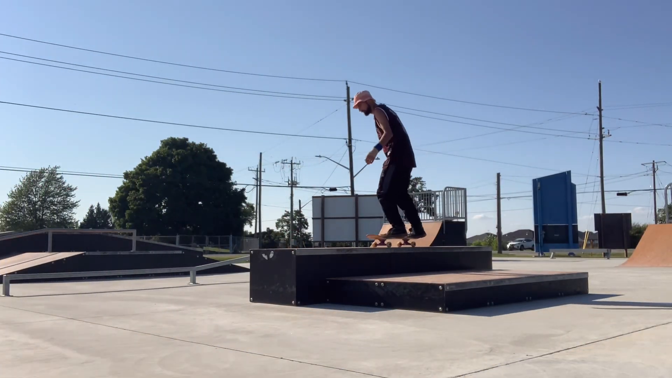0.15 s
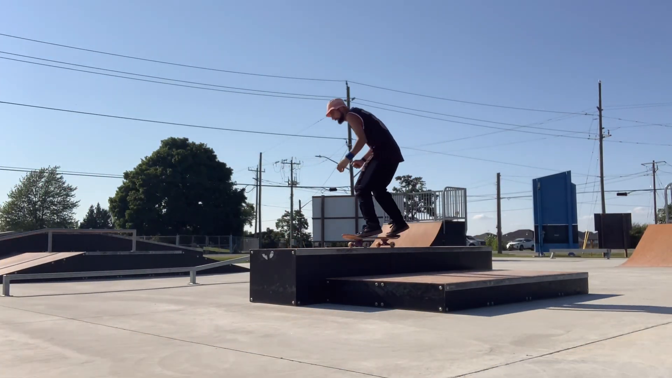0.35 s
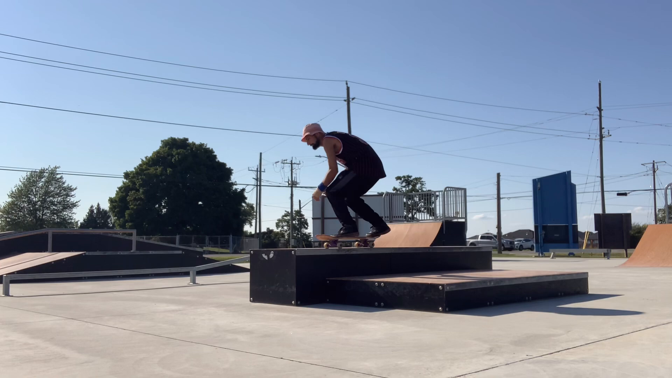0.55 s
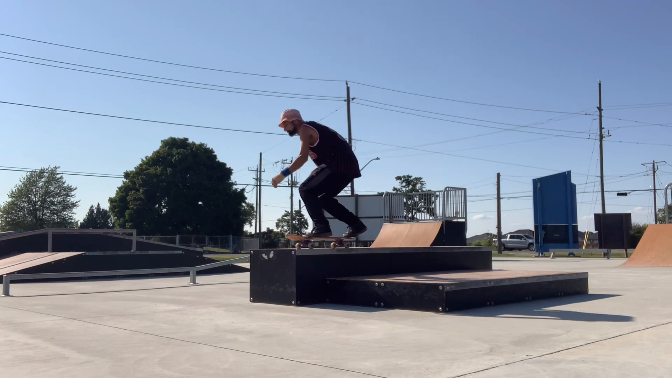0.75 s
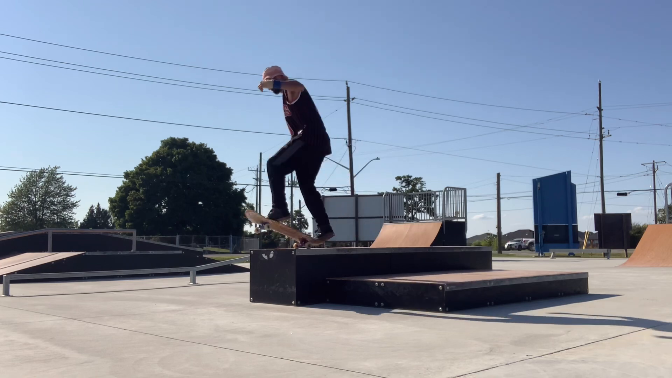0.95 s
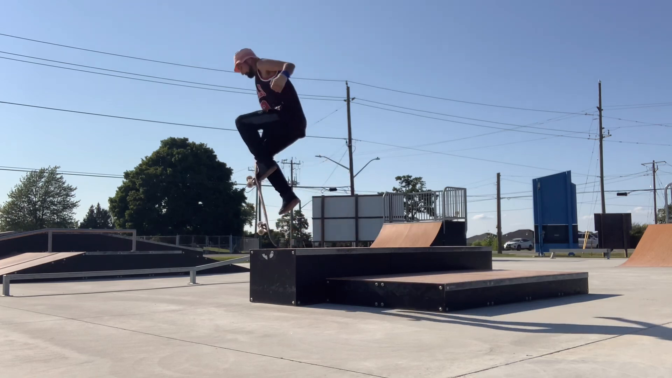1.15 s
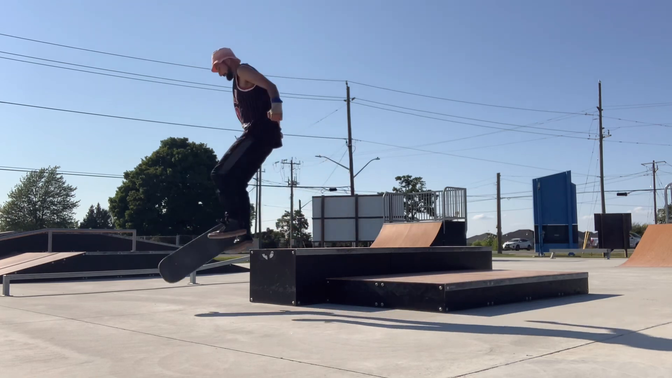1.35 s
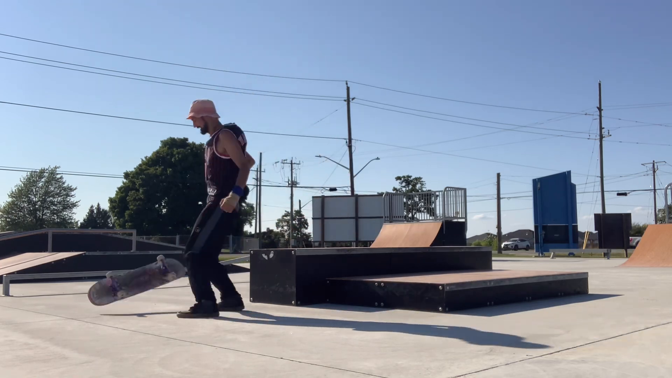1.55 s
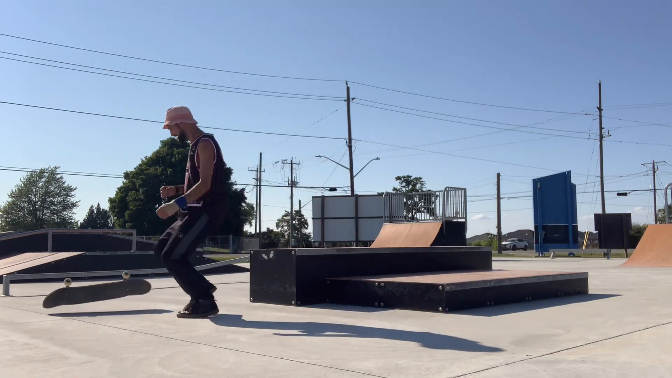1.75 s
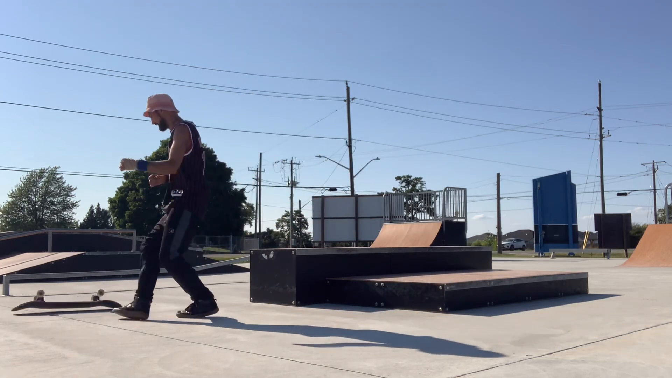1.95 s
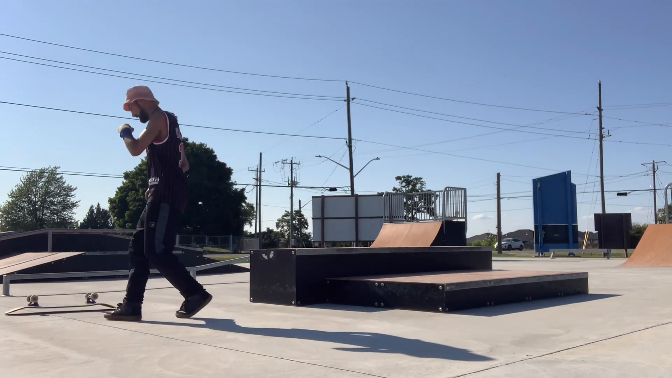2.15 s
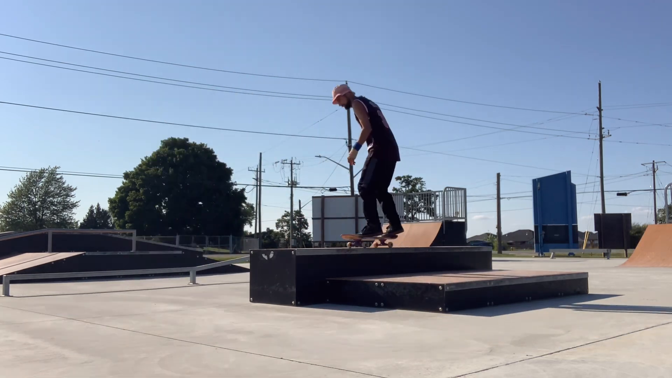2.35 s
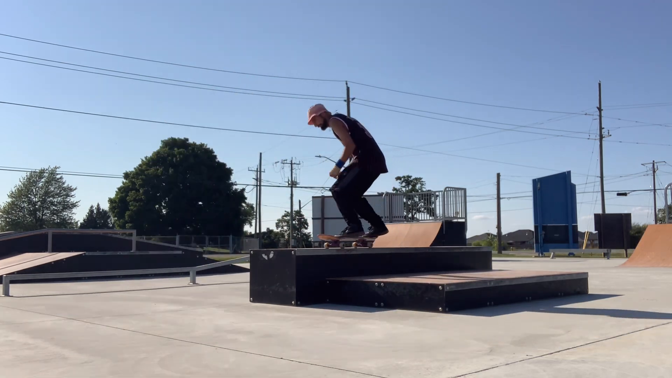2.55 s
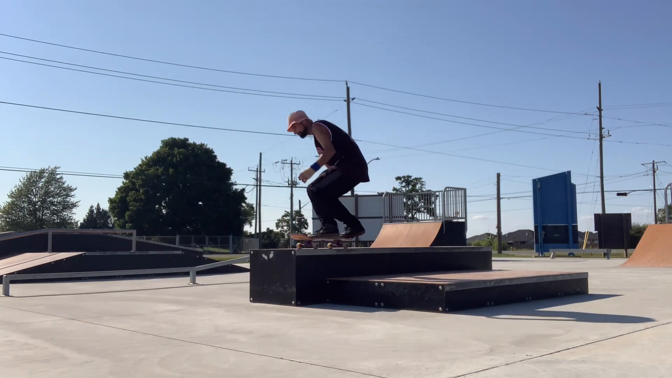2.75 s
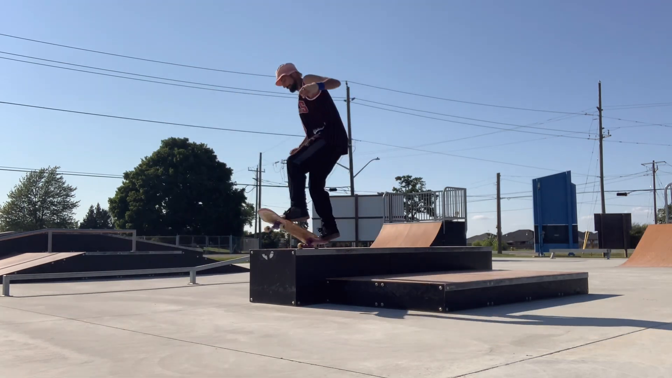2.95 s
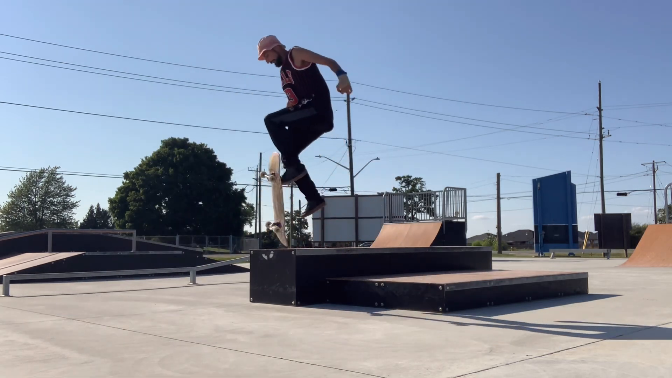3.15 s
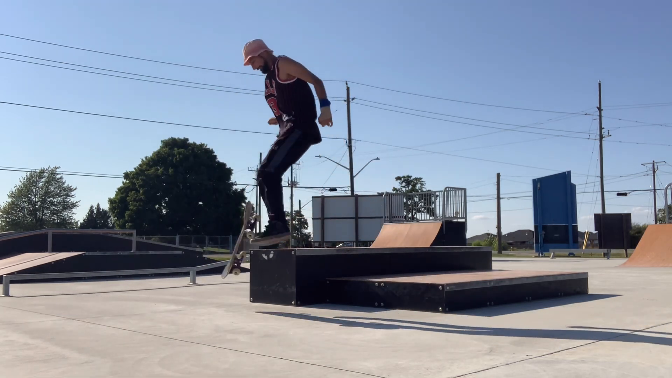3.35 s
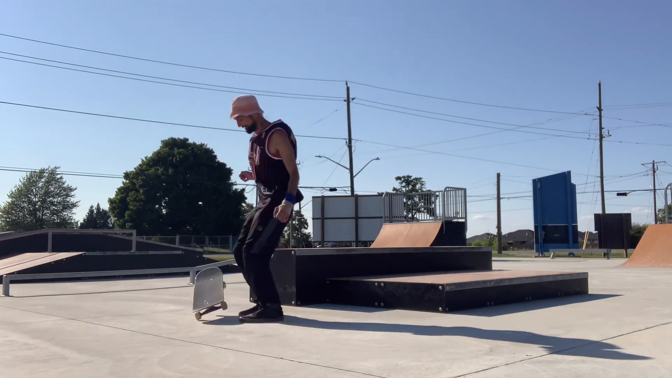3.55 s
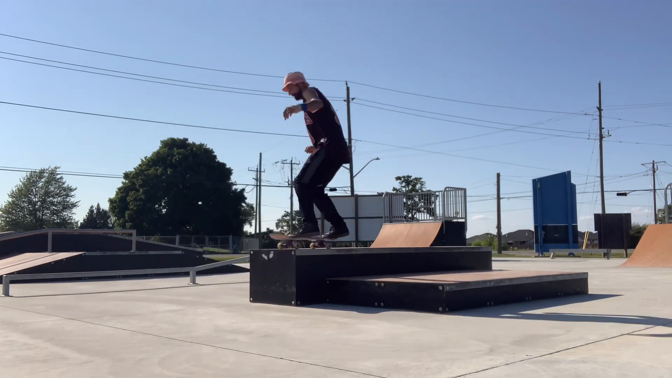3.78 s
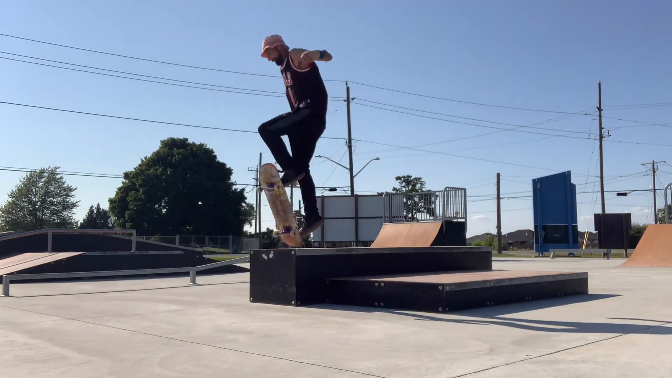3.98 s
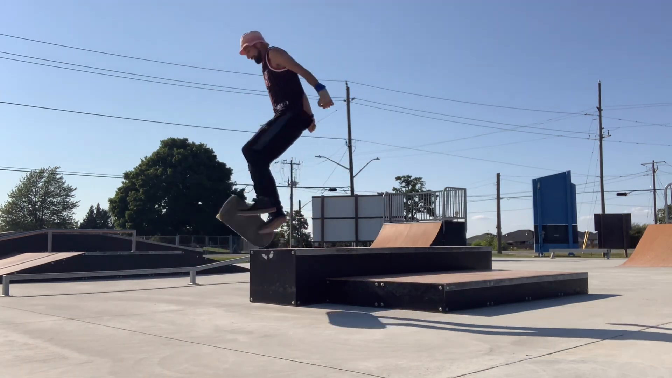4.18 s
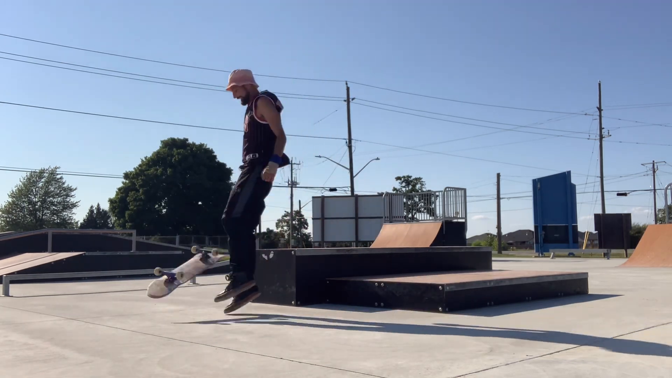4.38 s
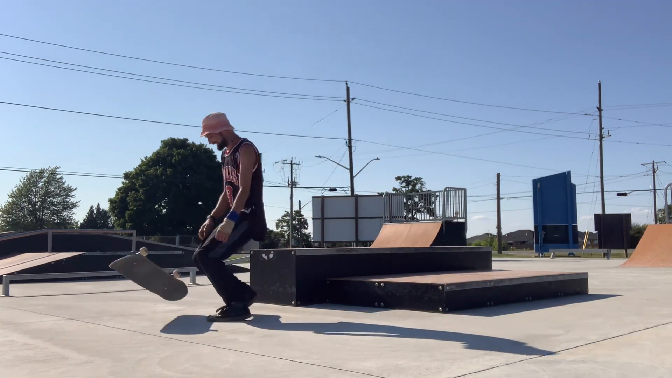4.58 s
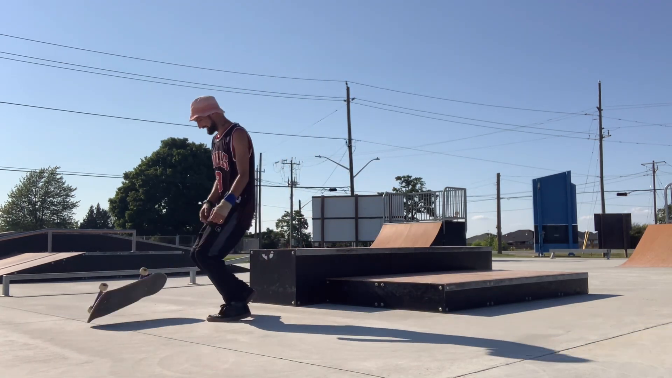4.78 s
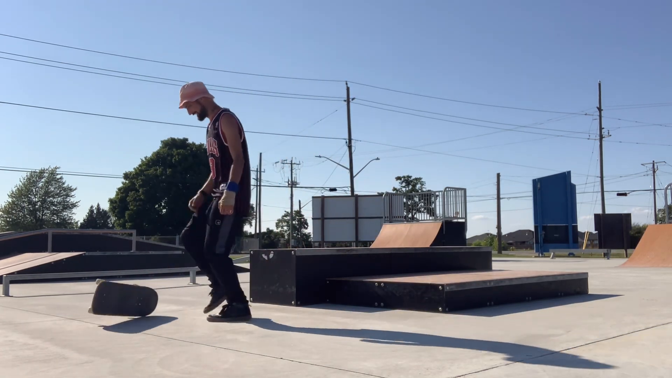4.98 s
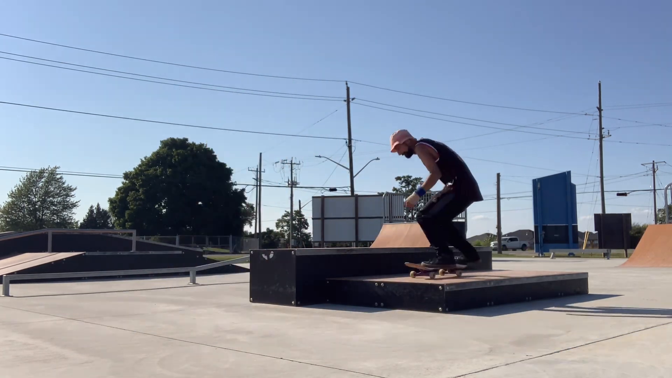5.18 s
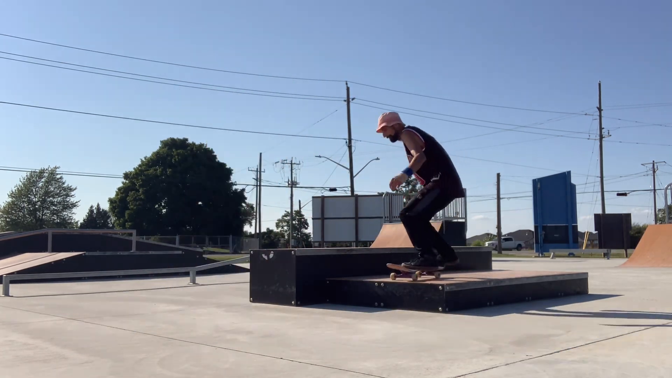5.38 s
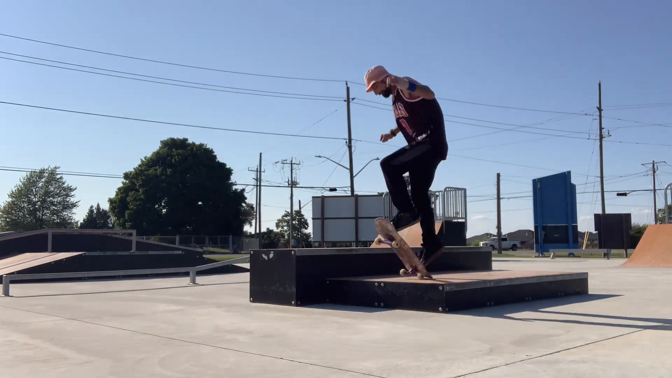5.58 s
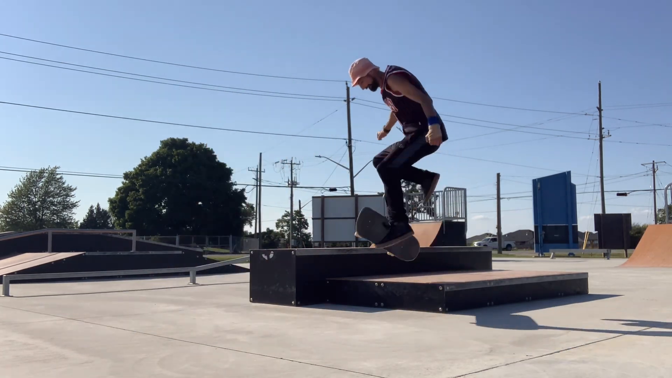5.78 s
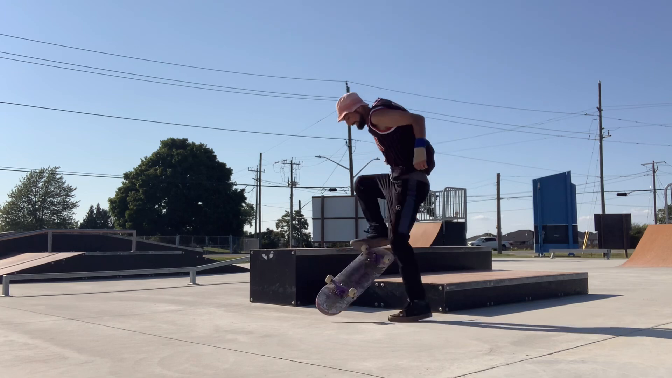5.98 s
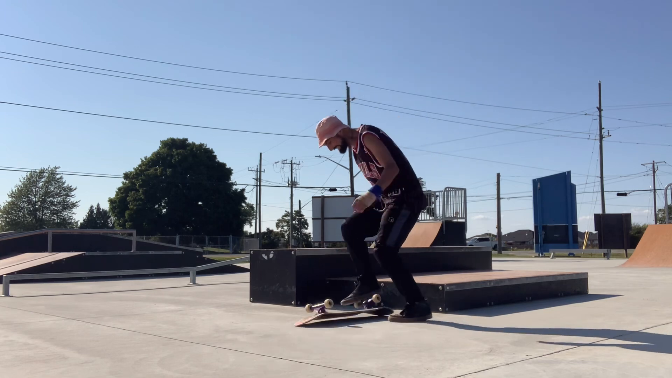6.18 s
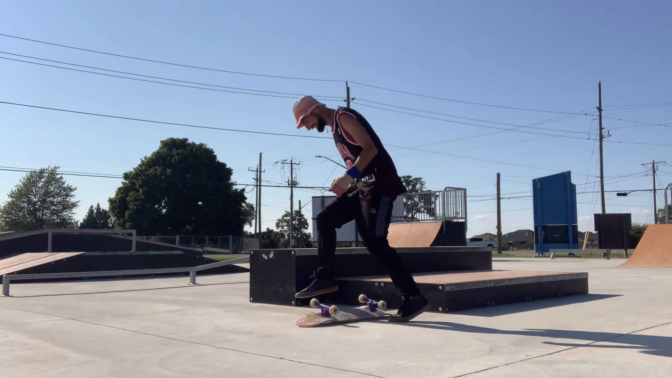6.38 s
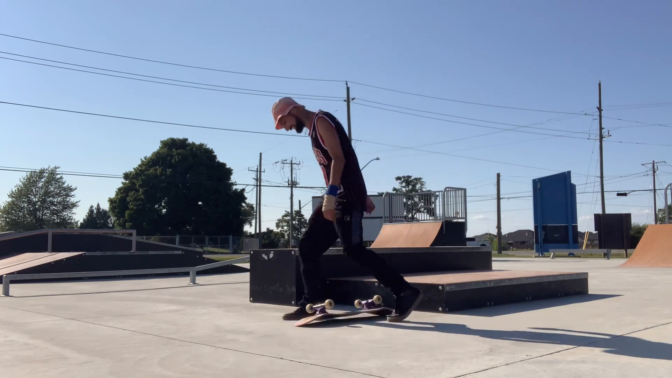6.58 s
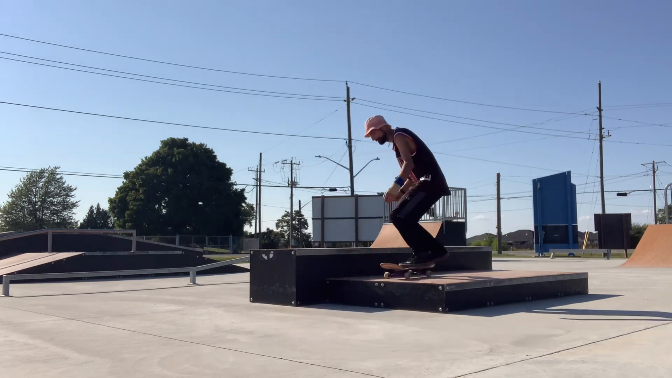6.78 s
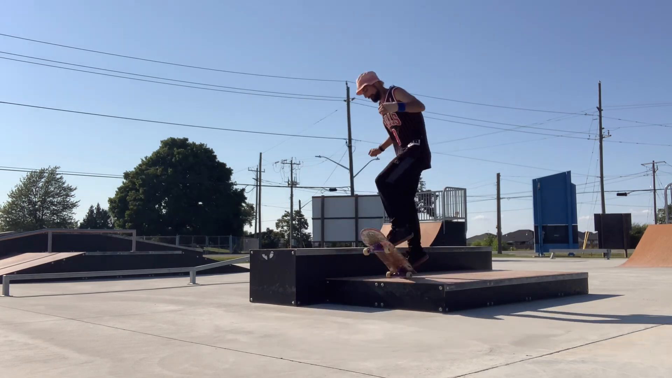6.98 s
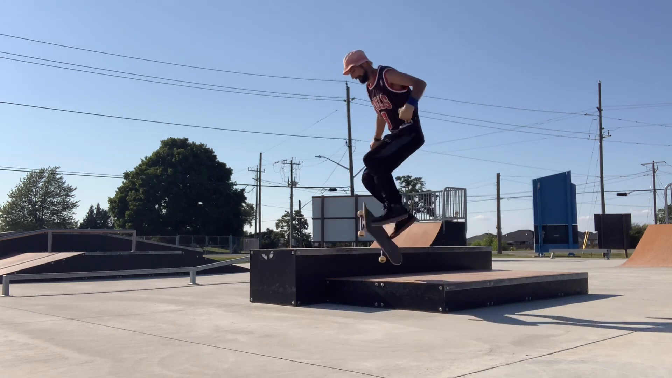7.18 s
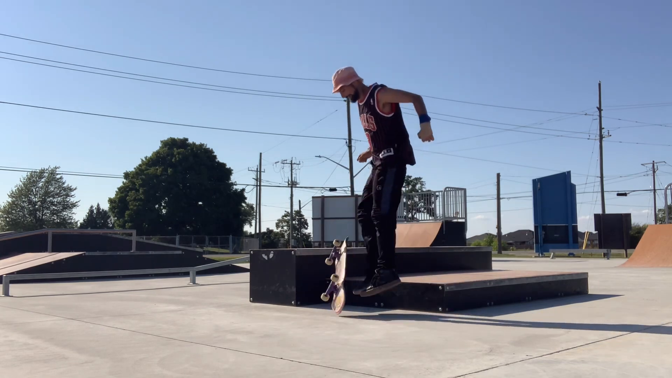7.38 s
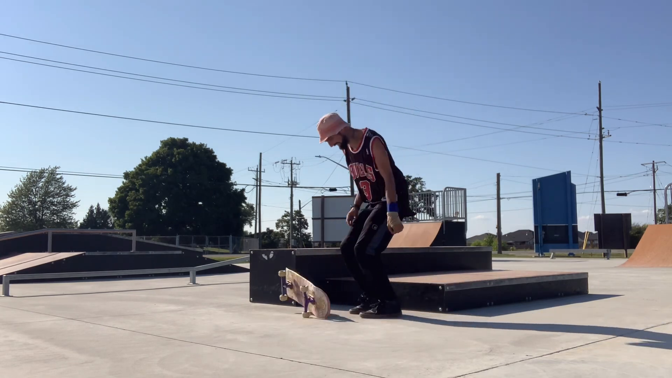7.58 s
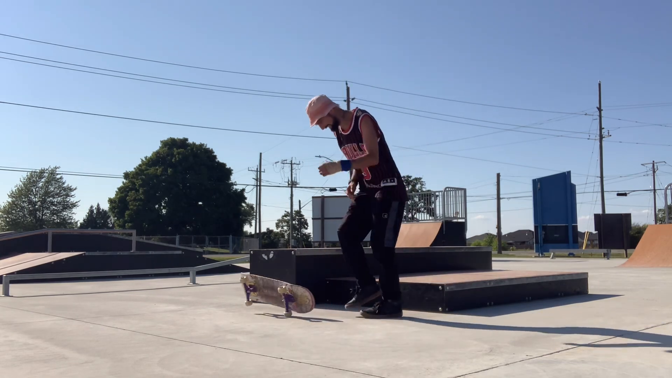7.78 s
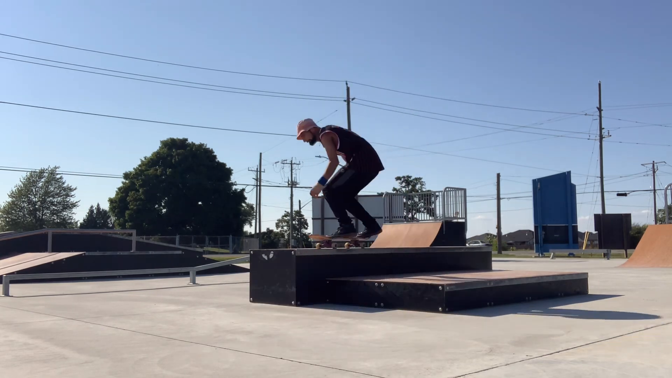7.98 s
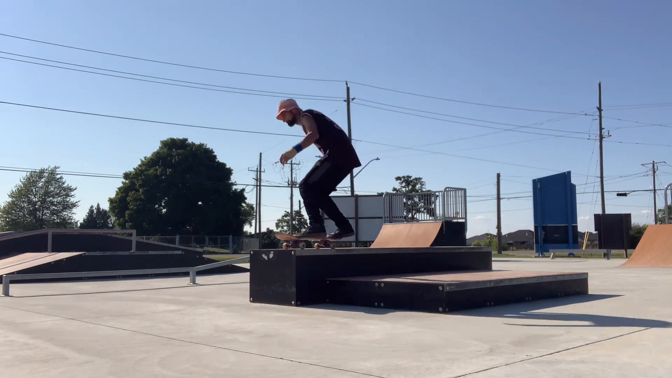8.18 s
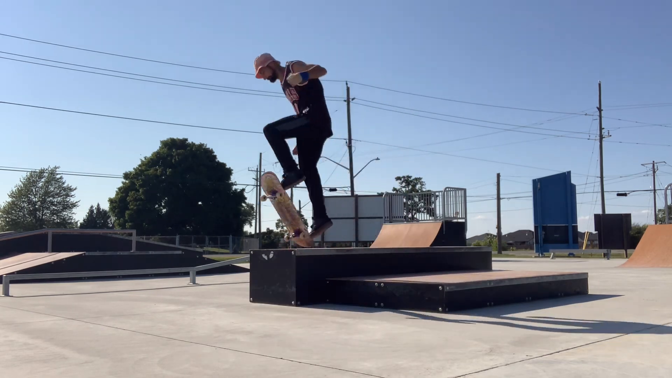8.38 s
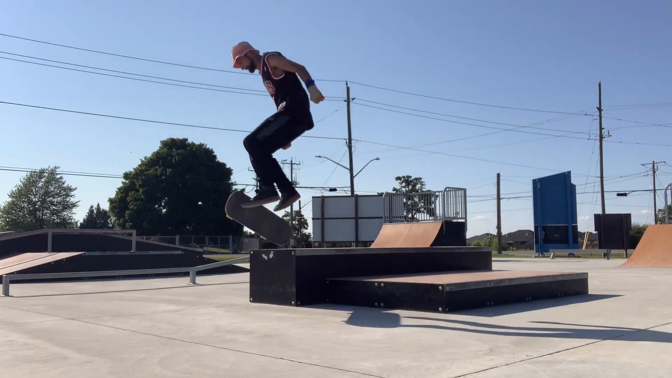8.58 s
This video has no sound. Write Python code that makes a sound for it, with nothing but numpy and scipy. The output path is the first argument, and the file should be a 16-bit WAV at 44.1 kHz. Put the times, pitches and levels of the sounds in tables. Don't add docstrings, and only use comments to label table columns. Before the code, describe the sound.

Six short skateboard attempts joined abruptly in an open concrete skatepark, heard from a phone some metres away. Each brings a tail pop or taps on a hollow wooden box, then usually loud woody slams, bounces and clatter on concrete with a short echo. Wind thumps and flutters in bursts over very faint traffic hum; the last try stops after its pop and a light rattle.

```python
import sys
import numpy as np
from scipy import signal
from scipy.fft import rfft, irfft, next_fast_len
from scipy.io import wavfile
from scipy.ndimage import uniform_filter1d, map_coordinates

SR = 44100
rng = np.random.default_rng(int(sys.argv[2]) if len(sys.argv) > 2 else 0)


def digitize_waveform(pressure):
    field = np.atleast_2d(pressure).T
    bounded = np.clip(field, -1, 1)
    quanta = np.round(bounded * 32767).astype(np.int16)
    wavfile.write(sys.argv[1], SR, quanta)


def boost_factor(decibels):
    exponent = np.asarray(decibels, float) / 20
    return 10 ** exponent


N = 381024

# (time [s], peak [dB], deck tone [Hz], clack [dB], tick [dB])
SLAMS = [(1.407, -2.5, 907, -31, -34.5), (1.492, -10.5, 384, -16.5, -32), (1.656, -1, 616.4, -12, -37.5),
         (1.718, -4, 630.6, -11, -51.5), (1.91, -11, 430.4, -13.5, -39), (1.943, -11, 634, -12.5, -62.5),
         (2.022, -20.5, 680, -23.5, -32), (2.136, -32, 970, -27, -37), (2.087, -41, 644, -26, -40),
         (2.147, -28, 1000, -47, -53.5), (3.468, -15, 906, -26, -17.5), (3.518, -23, 405, -7, -22.5),
         (3.533, -12, 827, -12.5, -30.5), (3.542, -15.5, 407.3, -22, -44), (4.359, 0.64, 703, -38.5, -36.5),
         (4.557, -0.5, 1000, -27, -50), (4.763, -10.5, 708.6, -21, -28.5), (4.898, -6, 735.7, -50.5, -52),
         (6.021, -0.56, 630, -16.5, -45.5), (6.078, -4.5, 849.6, -6, -44.5), (6.118, -7.5, 770, -5, -47),
         (7.393, -3.5, 990, -29.5, -31.5), (7.577, -13.5, 841, -47, -41), (7.659, -8.5, 854, -24.5, -28.5),
         (7.896, -16.5, 829, -37, -32)]
# (time [s], peak [dB], deck tone [Hz], tick [dB])
POPS = [
    (0.992, -24.5, 819, -13.5),
    (2.994, -19.5, 897, -16.5),
    (3.923, -18.5, 987, -21),
    (5.519, -61, 836, -2),
    (5.534, -57, 855, -7),
    (5.6, -28.5, 842, -23),
    (6.501, -36, 502, -19.5),
    (7.035, -14, 1138, -21),
    (8.342, -21, 737, -15),
]
# (time [s], peak [dB], deck tone [Hz], clack [dB])
RATTLES = [(1.201, -29, 605, -21), (1.473, -28.5, 412, -14), (1.462, -34, 600, -11.5),
           (1.517, -30.5, 500, -11), (1.523, -28, 465, -11.5), (1.531, -30.5, 450, -12),
           (1.555, -32.5, 400, -12.5), (1.677, -21.5, 649, -13), (1.781, -30.5, 2210, -11.5),
           (1.96, -24, 386, -12.5), (1.974, -24, 500, -24), (1.999, -35.5, 2240, -17),
           (3.369, -62, 720, -4), (3.491, -25, 616, -17.5), (3.51, -33.5, 700, -6),
           (3.556, -27.5, 2100, -16), (4.081, -24, 615, -20.5), (4.402, -30, 900, -14),
           (4.425, -29, 800, -9), (4.45, -27.5, 900, -12.5), (4.49, -30, 800, -13),
           (4.545, -37.5, 3050, -18.5), (4.772, -17.5, 800, -35), (4.828, -31, 900, -36),
           (4.91, -15.5, 786, -59), (4.96, -35, 750, -41), (5.11, -34.5, 1180, -30),
           (5.618, -21, 1718, -28), (5.974, -32, 790, -14), (5.992, -34.5, 700, -13),
           (6.031, -8.5, 900, -16.5), (6.175, -35, 800, -14), (6.046, -21, 2200, -27.5),
           (6.1, -28.5, 1784, -28), (6.113, -17, 1402, -29), (6.15, -22, 711, -8), (6.538, -36, 580, -15.5),
           (7.5, -32, 396, -15.5), (7.382, -26.5, 643, -44), (7.42, -25, 1500, -38),
           (7.635, -25, 950, -37.5), (7.753, -29.5, 770, -39.5), (7.823, -39.5, 612, -26),
           (7.869, -39, 834, -42), (8.531, -23, 756, -11), (7.462, -25.5, 1510, -35),
           (4.562, -8, 706, -29.5), (4.757, -24.5, 1515, -28), (2.032, -25, 646, -35.5)]
# (calm [dB], windy [dB])
RATTLE_TICK_DB = (-33.5, -42)
BOARD_PAN_DB = (-5.5, -5.5, -3.5, -6, -4, -6)
# (time [s], tone [dB], tone [Hz], left-right [dB])
UPPER_TONES = [(0.991, -27.5, 1055, -4.0), (1.405, -7, 1424, -4.0), (1.492, -15, 1170, -6.5),
               (1.658, -5.5, 1395, -4), (1.719, -3, 1245, -5.5), (1.911, -14, 1644, -5),
               (1.941, -12, 2140, -2.5), (2.021, -23, 1710, -1.5), (2.14, -30.5, 1050, -7.5),
               (2.993, -20.5, 1087, -2.5), (3.468, -25, 1500, -3.5), (3.532, -11.5, 1490, -9),
               (3.925, -21, 1052, -7.5), (4.361, -2.5, 1050, -1.5), (4.762, -16.5, 1573, -3.5),
               (4.9, -10, 1060, 1.0), (6.022, -5, 1046, -9.0), (7.036, -14, 1072, -8),
               (7.392, -7.5, 1273, -6.0), (7.576, -21.5, 1058, -4.5), (7.658, -1.5, 1760, -6.5),
               (7.898, -23, 1060, -3), (8.343, -25, 1087, -3.5)]
# (time [s], tone [dB], tone [Hz], left-right [dB])
HIGH_UPPER_TONES = [
    (4.557, -4, 2047, -5),
    (6.077, -3.5, 3640, -8),
    (6.118, -9, 2060, -8.5),
]
# (frequency [Hz], level [dB], t60 [s])
DECK_MODES = [(276, -6, 0.021), (425, -6, 0.096), (649, 2, 0.024), (880, -6, 0.069), (996, -3.5, 0.0069),
              (1235, -7.5, 0.0049), (1430, -5, 0.0024), (1730, -13.5, .02), (2160, -25.5, .03)]
# (frequency [Hz], level [dB], t60 [s])
TRUCK_MODES = [(2215, -1.5, 0.042), (2540, -2, 0.044), (3200, -6, 0.0093), (3720, -5.5, 0.011)]
# (frequency [Hz], level [dB])
THUD = [(280, -43.5), (450, -11), (700, -1), (1100, -7.5), (1850, -13), (2100, -25), (3500, -61.5)]
# (frequency [Hz], level [dB])
CLACK_WINDY = [(1060, -30), (1800, 0.5), (2060, 1), (3360, -6.5), (3710, -3.5), (5410, -19.5),
               (6410, -17.5), (7710, -38.5), (8390, -29.5), (9810, -56.5), (12800, -73), (21600, -120)]
# (frequency [Hz], level [dB])
CLACK_CALM = [(880, -32), (1500, -2), (1770, -6.5), (2020, -16), (2640, -16), (3090, -23), (3530, -11),
              (4050, -26), (4680, -20.5), (5370, -37), (6130, -18.5), (7330, -43), (7800, -36.5),
              (10100, -57.5), (17200, -120)]
# (frequency [Hz], level [dB])
TICK = [(7750, -57), (8040, 3.5), (8500, 0.5), (9200, -8), (10000, -22.5), (12000, -28.5), (14000, -58)]
# (time [s], frequency [Hz], level [dB], t60 [s])
BOX_BOOM = (7.11, 322, -63, 1.6)
# (frequency [Hz], t60 [s], level [dB])
YARD = [(300, 0.11, -2), (800, 0.24, -2.5), (1680, 0.17, -6), (2300, .12, -5), (5000, 0.1, -3.5),
        (9000, 0.29, -7)]
# (frequency [Hz], phase [rad])
BEAM_LEAD = [(300, 0.48), (700, -1.1), (1200, 1.4), (2500, 1), (5000, 2), (9000, -1)]
# (time [s], frequency [Hz], level [dB], length [s])
WHUMPS = [
    (7.545, 95, -15, 0.017),
    (5.9, 74, -21.5, 0.019),
    (1.6, 63, -23.5, 0.025),
    (4.652, 62, -12, 0.0078),
    (4.637, 240, -14, .007),
    (4.625, 150, -16, 0.0078),
    (4.605, 120, -15, 0.011),
    (3.545, 220, -13, 0.0045),
    (1.6, 110, -22.5, .008),
]
# (time [s], hold [s], level [dB], fall [s per 60 dB])
THUMPS = [(0.01, .14, -58, .2), (0.685, .02, -53, .2), (1.455, .52, -35, .12), (1.6, .02, -28, .3),
          (1.78, .02, -24, .4), (1.97, .04, -24, .09), (3.14, .02, -28, .6), (3.3, .1, -43, .07),
          (3.53, .1, -45, .3), (3.67, .07, -29, .22), (4.42, .17, -31, .13), (4.605, .06, -22, .1),
          (5.125, .1, -41, .08), (5.7, .02, -39, .5), (5.9, .02, -28, .26), (5.97, .17, -41, .2),
          (6.2, .3, -53, 1.2), (6.58, .02, -47, .1), (7.545, .015, -34, .05), (7.68, .04, -50, .5),
          (8.455, .04, -37, .3), (8.51, .02, -33, .9)]
# (time [s], hold [s], level [dB], fall [s per 60 dB])
FLUTTERS = [(1.43, .1, -29, .3), (1.62, .3, -41, .2), (1.735, .01, -27, .2), (1.93, .055, -25, .06),
            (3.13, .04, -38, .5), (3.2, .17, -46, .08), (3.47, .04, -37, .2), (3.535, .01, -18, .16),
            (3.62, .12, -46, .9), (4.41, .15, -35, .2), (4.59, .06, -24, .1), (4.63, .02, -19, .07),
            (5.125, .08, -43, .1), (5.69, .2, -41, .5), (5.98, .18, -34, .15), (6.2, .3, -52, .5),
            (7.4, .01, -44, .15), (7.505, .05, -35, .05), (8.455, .05, -40, .4), (8.545, .08, -34, .6)]
# (time [s], hold [s], level [dB], fall [s per 60 dB])
SCUFFS = [(1.43, .05, -49, .2), (1.49, .002, -40, .15), (1.718, .002, -35, .15), (1.79, .11, -62, .2),
          (1.96, .002, -50, .4), (3.11, .03, -63, .5), (3.15, .23, -69, .08), (3.485, .03, -50, .2),
          (3.536, .002, -35, .12), (3.57, .002, -51, .3), (3.68, .12, -74, .2), (4.41, .03, -52, .4),
          (4.57, .002, -48, .3), (5.12, .002, -68, .2), (5.68, .002, -59, .25), (5.98, .03, -62, .1),
          (6.165, .37, -62, .15), (7.5, .03, -64, .2), (8.44, .002, -57, .35), (8.526, .002, -52, .8)]
RISE_S = dict(thump=.09, flutter=.07, scuff=.04, hum=.13)
# (start [s], end [s])
WINDY = [
    (1.43, 2.015),
    (3.11, 3.44),
    (3.485, 3.805),
    (4.4, 4.67),
    (5.12, 5.25),
    (5.67, 6.6),
    (7.49, 7.565),
    (8.44, 8.64),
]
# (frequency [Hz], level [dB])
THUMP = [(26, -30.5), (44, 6), (91, -2.5), (140, -6.5), (180, -34), (310, -120)]
# (frequency [Hz], level [dB])
FLUTTER = [(65, -27), (110, -6), (232, -3.5), (350, -8), (403, -12.5), (600, -19.5), (780, -44.5),
           (1320, -120)]
# (frequency [Hz], level [dB])
RUMBLE = [(12, -37), (20, -8.5), (49, 1), (220, -18), (247, -15), (450, -12), (580, -41), (990, -120)]
# (frequency [Hz], level [dB])
HUM = [(240, -40), (400, -15), (490, -17), (569, -6.5), (686, -12), (740, -2), (1080, -15.5), (1750, -26),
       (2200, -39.5), (3120, -58.5), (5280, -120)]
# (frequency [Hz], level [dB])
HISS = [(210, -30), (350, 1.5), (729, -9.5), (815, -9.5), (1340, -11), (1580, -14.5), (4010, -23.5),
        (5600, -41.5), (7590, -56.5), (8710, -40), (9600, -51), (12500, -81), (21100, -120)]
# (start [s], hum [dB], breeze [dB])
BACKGROUND = [(0, -68.5, -70.5), (0.991, -54, -60), (1.2, -49, -55), (2.03, -73.5, -73), (2.225, -72, -79),
              (3.0, -57, -57.5), (3.811, -65.5, -67), (3.93, -54, -55), (4.95, -60, -59.5),
              (5.2, -70, -80.5), (5.6, -56, -55), (6.4, -73, -62), (6.625, -69, -76.5), (7.04, -62, -65.5),
              (7.58, -51.5, -62.5), (7.97, -70.5, -72.5), (8.35, -55.5, -55.5), (8.47, -51, -53)]
# (frequency [Hz], level [dB])
SELF_NOISE = [(200, -19.5), (1500, 3), (4600, 1), (5300, -11), (6000, -1.5), (9000, -9), (9500, -16),
              (10500, -7.5), (13300, -10), (14200, -71)]
# (time [s], click [dB])
SPLICES = [
    (2.222, -53),
    (3.806, -58),
    (5.119, -41),
    (6.62, -70),
    (7.968, -54.5),
]


def board():
    lead_in = SR // 50
    t = (np.arange(SR // 5) - lead_in) / SR
    early = t[:SR // 11]
    ring, thud, windy_clack, calm_clack, tick = np.zeros((5, 2, N + SR))
    hits = blows()
    luck = rng.standard_normal((len(hits), 2, len(DECK_MODES) + 2, 3))

    crack = 1.5 * swell(t - .0015, .004, .007)
    thud_shape = swell(t - .004, 0.0098, 0.056) + 0.068 * swell(t - .004, 0.015, 0.2)
    windy_tail = 0.6 * swell(t - .002, 0.022, 0.047) + 0.09 * swell(t, 0.0047, 0.15)
    calm_shape = crack + 0.35 * swell(t - .002, 0.0036, 0.033) + 0.044 * swell(t, .007, .12)
    tick_shape = crack + 0.24 * swell(t - .002, 0.0084, 0.029) + 0.054 * swell(t, .007, .25)
    scrape = np.pad(unit(boost_factor(3.3 * wobble(150))), (lead_in, SR))

    for (s, db, tone_hz, clack_db, tick_db, pan_db), (deck_luck, truck_luck) in zip(hits, luck):
        deck_luck[:2] *= [0, 1, 0]
        overtone, pan_db = upper(s, db, pan_db)
        windy = in_wind(s)
        modes = [(hz, level - 19 * (k < 2 and not windy), t60)
                 for k, (hz, level, t60) in enumerate(DECK_MODES)]
        wood = ringing([(tone_hz, 4, .035), overtone] + modes, deck_luck, early)
        wood = wood / np.abs(wood).max()
        metal_db = clack_db - 13 - 6 * (not windy)
        wood = wood + boost_factor(metal_db) * ringing(TRUCK_MODES, truck_luck, early)

        at = slice(round(s * SR), round(s * SR) + len(t))
        uncut = s + t < min([cut for cut, _ in SPLICES if cut > s] + [N / SR])
        sides = boost_factor(db + pan_db * np.array([[.5], [-.5]]))
        ring[:, at][:, :len(early)] += sides * wood
        thud[:, at] += sides * uncut * thud_shape
        clack_gain = sides * boost_factor(clack_db) * uncut
        if windy:
            windy_clack[:, at] += clack_gain * (crack + windy_tail * scrape[at])
        else:
            calm_clack[:, at] += clack_gain * calm_shape
        tick[:, at] += boost_factor(db + tick_db) * uncut * tick_shape

    layers = (ring, thud, windy_clack, calm_clack, tick)
    ring, thud, windy_clack, calm_clack, tick = (v[:, lead_in:lead_in + N] for v in layers)
    body = filtered(thud * white(1.0), lambda hz: boost_factor(along(THUD, hz) + 2.5))
    grain = white(0.91)
    grit = filtered(windy_clack * grain, lambda hz: boost_factor(along(CLACK_WINDY, hz) + 7.5))
    grit += filtered(calm_clack * grain, lambda hz: boost_factor(along(CLACK_CALM, hz) + 15.5))
    top = filtered(tick * rng.standard_normal(N), lambda hz: boost_factor(along(TICK, hz) + 11.0))
    return boost_factor(-4.0) * ring + body + grit + top * boost_factor([[-9], [4]])


def blows():
    pop_clack_db = -14.5
    rows = SLAMS + [(s, db, hz, pop_clack_db, tick_db) for s, db, hz, tick_db in POPS]
    rows += [(*row, RATTLE_TICK_DB[in_wind(row[0])]) for row in RATTLES]
    return [(*row, BOARD_PAN_DB[attempt(row[0])]) for row in rows]


def upper(s, db, pan_db):
    over_modes_db, ceiling_db, cycles_per_60db = 2, 3, 22
    for at, tone_db, hz, side_db in UPPER_TONES + HIGH_UPPER_TONES:
        if abs(at - s) < .006:
            return (hz, min(tone_db - db + over_modes_db, ceiling_db), cycles_per_60db / hz), side_db
    return (1000, -90, .01), pan_db


def ringing(modes, luck, t):
    total = 0
    for (hz, level_db, t60), (strength, phase, detune) in zip(modes, luck):
        envelope = boost_factor(level_db + 2.4 * strength) * swell(t - 3.5 / hz, 0.013, t60)
        cycles = hz * (1 + 0.032 * detune) * t + phase
        total = total + envelope * np.sin(2 * np.pi * cycles)
    return total


def box():
    s, hz, db, t60 = BOX_BOOM
    t = np.arange(N) / SR - s
    envelope = boost_factor(db + 2.9 * wobble(20)) * swell(t, .15, t60) * (t < .25)
    return envelope * np.sin(2 * np.pi * hz * t + 0.9 * wobble(18))


def yard(x):
    hz, t, z = signal.stft(rng.standard_normal((2, SR // 2)), SR, nperseg=256)
    t60 = along([row[:2] for row in YARD], hz)[:, None]
    level_db = along([row[::2] for row in YARD], hz)[:, None]
    slap_db = 8 * np.exp(-((t - .055) / .005) ** 2)
    tail = signal.istft(z * boost_factor(level_db + slap_db - 60 * t / t60), SR, nperseg=256)[1]
    answer = boost_factor(-15.0) * tail / np.linalg.norm(tail[0])
    answer = np.pad(answer, ((0, 0), (300, 0)))
    attempts = np.split(x, [round(s * SR) for s, _ in SPLICES], axis=1)
    return np.hstack([signal.fftconvolve(part, answer, axes=1)[:, :part.shape[1]] for part in attempts])


def whumps():
    out = np.zeros(N)
    t = np.arange(-SR // 10, SR // 10) / SR
    for s, hz, db, length_s in WHUMPS:
        pulse = boost_factor(db) * np.exp(-(t / length_s) ** 2) * np.sin(2 * np.pi * hz * t)
        out[round(s * SR) - SR // 10:][:len(t)] += pulse
    return out


def gusts():
    breeze_db = background()[1]
    thump_db = peaks_db(THUMPS, RISE_S["thump"], breeze_db)
    flutter_db = peaks_db(FLUTTERS, RISE_S["flutter"], breeze_db - 6)
    lumps = wobble(22)
    thump = boost_factor(thump_db - 0.5 + 2.0 * lumps) * steady(rush(THUMP, 0.91), 0.12)
    flutter_gain = boost_factor(flutter_db - 4.5 + 2.0 * lumps + 3.5 * wobble(54))
    flutter = flutter_gain * steady(rush(FLUTTER, 0.98), 0.06)
    return thump + flutter + boost_factor(-75.0) * rush(RUMBLE, 1.0)


def air():
    lift_db, lift_per_db, lag_s, fall_s = -42, 0.7, 0.044, 0.65
    lifts = [(s + lag_s, 0, lift_db + lift_per_db * db, fall_s) for s, db, *_ in blows()]
    hum_floor_db = background()[0]
    roll_db = peaks_db(lifts, RISE_S["hum"], hum_floor_db)
    scuff_db = peaks_db(SCUFFS, RISE_S["scuff"], 0 * hum_floor_db - 95)
    hum = boost_factor(roll_db - 1.0 + 2.8 * wobble(25) + 1.5 * wobble(5.9)) * rush(HUM, 0.29)
    top = boost_factor(roll_db - 32 + 2.2 * wobble(40)) * rush(TICK, 0.44)
    grains = unit(boost_factor(2.5 * wobble(70)) * rush(HISS, 0.39))
    hiss = gusty() * boost_factor(scuff_db + 10) * grains
    return boost_factor([[-1.5], [1.5]]) * (hum + hiss) + boost_factor([[-5], [3]]) * top


def background():
    settle_ms = 48
    s, *levels = np.transpose(BACKGROUND)
    row = np.searchsorted(s, np.arange(N * 1000 // SR + 1) / 1000, side="right") - 1
    return uniform_filter1d(np.array(levels)[:, np.maximum(row, 0)], size=settle_ms)


def gusty():
    t = np.arange(N) / SR
    blowing = sum((t >= a) & (t <= b) for a, b in WINDY) * 1.0
    return uniform_filter1d(blowing, size=SR // 80)


def in_wind(s):
    return any(a < s < b for a, b in WINDY)


def attempt(s):
    return np.searchsorted([cut for cut, _ in SPLICES], s)


def peaks_db(rows, rise, floor_db):
    t = np.arange(len(floor_db)) / 1000
    s, hold, db, fall = np.transpose(rows)[..., None]
    shape = db - 60 * np.maximum(0, np.maximum((s - t) / rise, (t - s - hold) / fall))
    shape = np.where(attempt(t) == attempt(s), shape, -200)
    return per_sample(np.maximum(shape.max(axis=0), floor_db))


def per_sample(values):
    return np.interp(np.arange(N) * 1000 / SR, np.arange(len(values)), values)


def wobble(rate_hz):
    ms = np.arange(N * 1000 // SR + 2)
    knots = rng.standard_normal(int(N * rate_hz / SR) + 4)
    return per_sample(map_coordinates(knots, [ms * rate_hz / 1000]))


def swell(t, rise, t60):
    return boost_factor(-60 * np.where(t < 0, -t / rise, t / t60))


def unit(x):
    return x / np.sqrt(np.mean(x ** 2) + 1e-20)


def steady(x, span_s):
    return x / np.sqrt(np.abs(uniform_filter1d(x ** 2, round(span_s * SR))) + 1e-3)


def along(points, hz):
    f, v = np.transpose(points)
    return np.interp(np.log(hz + 1), np.log(f + 1), v)


def filtered(x, response):
    m = next_fast_len(N + SR // 5)
    return irfft(rfft(x, m) * response(np.fft.rfftfreq(m, 1 / SR)), m)[..., :N]


def white(alike):
    a, b = rng.standard_normal((2, N))
    turn = np.arccos(np.clip(alike, -1, 1)) / 2
    common, differing = np.cos(turn) * a, np.sin(turn) * b
    return np.array([common + differing, common - differing])


def rush(spectrum, alike):
    return unit(filtered(white(alike), lambda hz: boost_factor(along(spectrum, hz))))


def scene():
    lean = np.array([[1], [-1]])
    hits = filtered(board(), lambda hz: np.exp(.5j * along(BEAM_LEAD, hz) * lean))
    echoes = yard(hits)
    around = box() + whumps() + gusts() + air()
    smear = unit(.4 + wobble(160))
    return hits + echoes * smear + around


def splices():
    clicks = np.zeros(N)
    for s, db in SPLICES:
        clicks[round(s * SR)] = boost_factor(db)
    return clicks


def band_limit(x):
    return signal.sosfilt(signal.butter(12, 14000, fs=SR, output="sos"), x)


def record(dry):
    side = filtered((dry[0] - dry[1]) / 2, lambda hz: 1 / (1 + (480 / (hz + 1)) ** 6) + .01)
    mid = filtered(dry.mean(axis=0), lambda hz: 1 / (1 + (40 / (hz + 1)) ** 4))
    beams = np.array([mid + side, mid - side])
    beams = beams / (1 + np.abs(beams / .95) ** 6) ** (1 / 6)
    beams = filtered(beams, lambda hz: 1 / (1 + (hz / 10500) ** 12) + 0.033)
    self_noise = boost_factor(-80 + 1.7 * wobble(23)) * rush(SELF_NOISE, 0.63)
    return band_limit(beams + self_noise + splices())


dry = scene()
out = record(dry)
digitize_waveform(out)
```